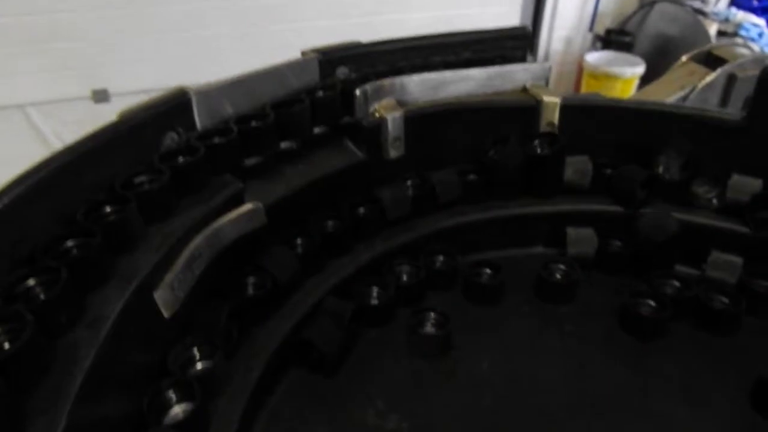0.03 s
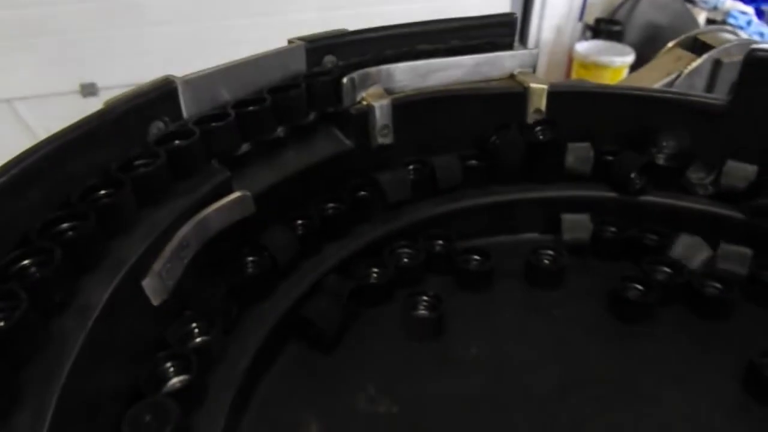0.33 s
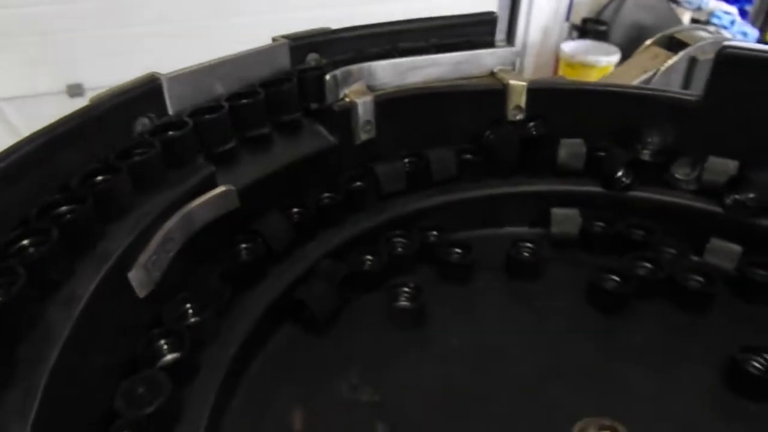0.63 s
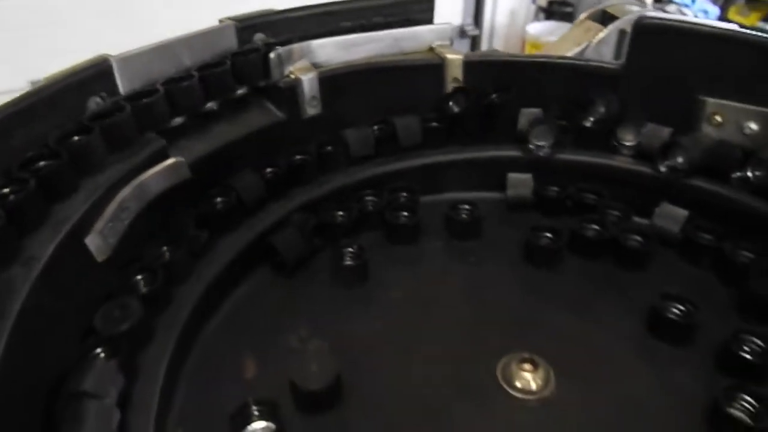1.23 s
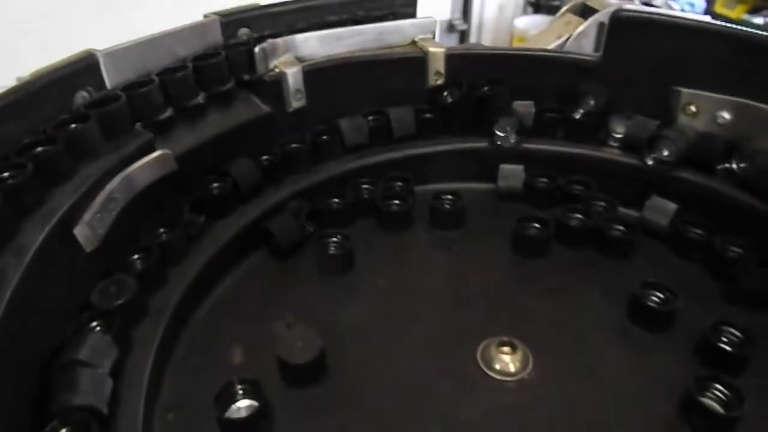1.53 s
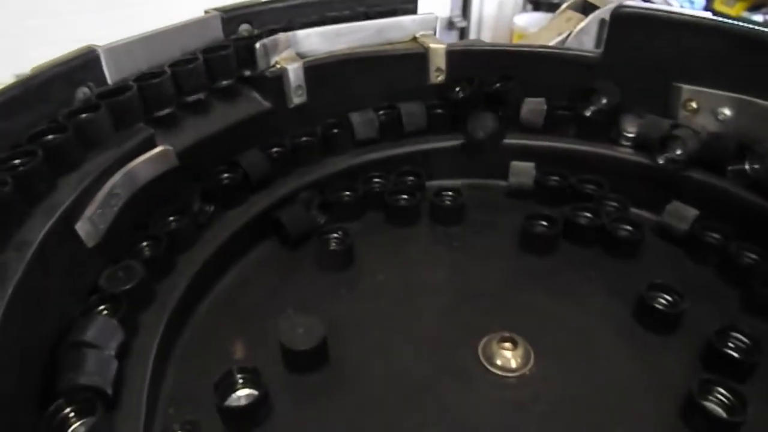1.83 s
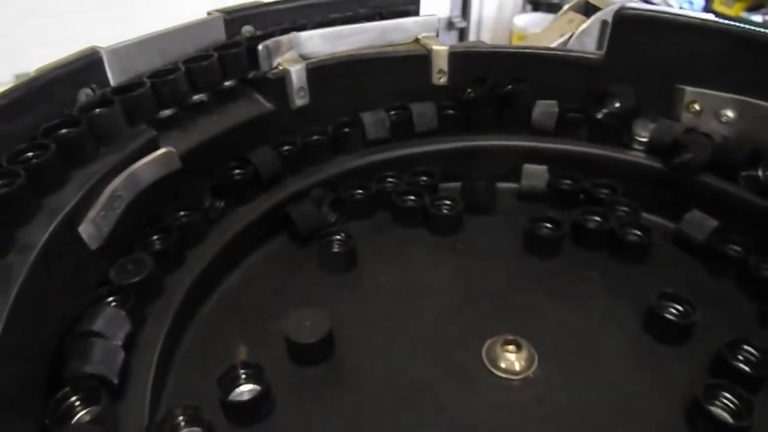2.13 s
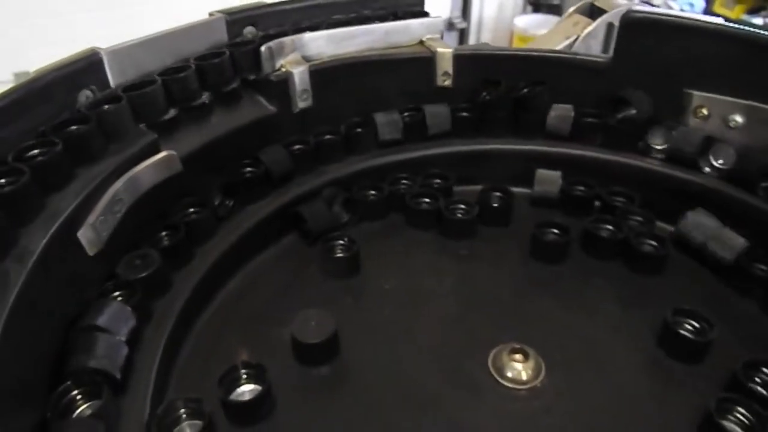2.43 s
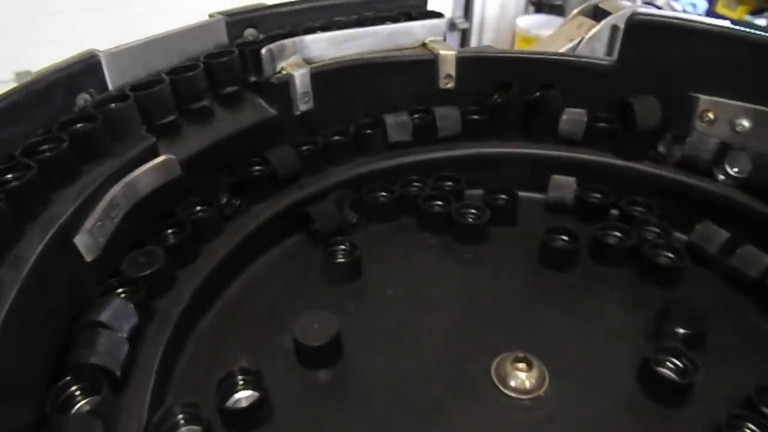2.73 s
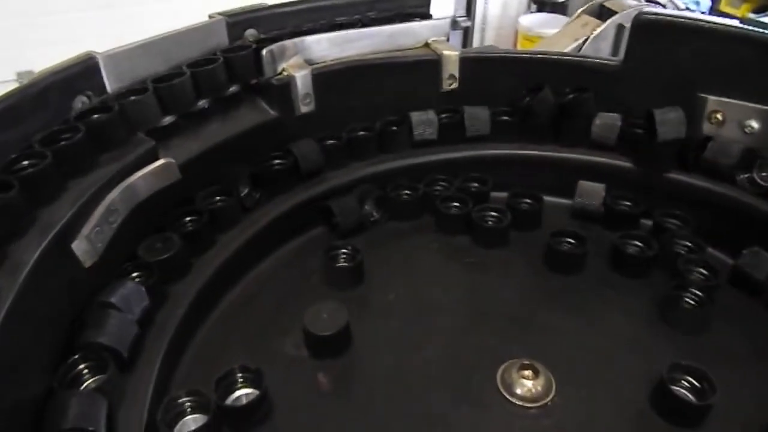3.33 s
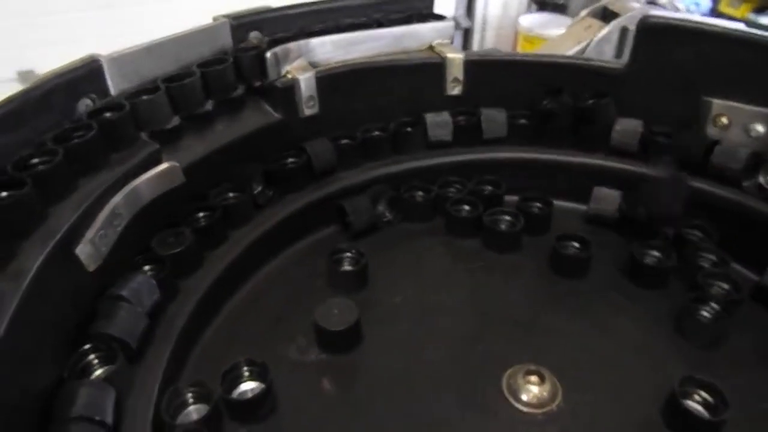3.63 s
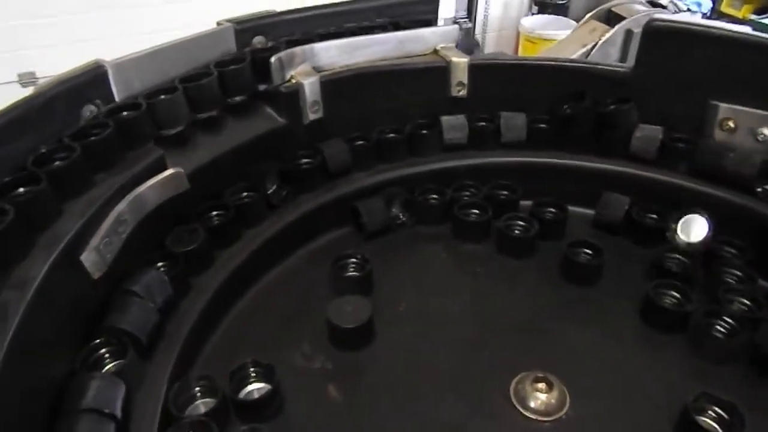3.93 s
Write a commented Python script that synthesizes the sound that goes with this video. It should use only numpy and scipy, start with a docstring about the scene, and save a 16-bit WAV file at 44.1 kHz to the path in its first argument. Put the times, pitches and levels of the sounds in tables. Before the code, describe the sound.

A parts sorter bowl hums and whirs steadily with a thin hiss, heard from just above. Small plastic caps patter and click sharply from the start, with short rattles from hard landings after 1.2 seconds. The patter dips near 2 seconds, then returns louder as caps rub a steel guide with a thin, fluttering ring. The guide clinks at 2.9 and 3.9 seconds, with clustered clicks around 3.6.

```python
"""A sorter bowl is running in a workshop: mains hum, motor tones and a thin hiss over a steady whir.
From the start, small plastic caps patter on its turning disc and click against each other;
a limiter briefly turns everything down after the sharpest clicks. From 1.2 s some caps land hard
and shake the bowl. The patter fades near 2 s, then comes back louder as caps rub a steel guide.
At 2.9 s and again just before the end, a blow sets the guide ringing."""
import sys
import numpy as np
from scipy import signal
from scipy.fft import rfft, irfft, next_fast_len
from scipy.io import wavfile
from scipy.ndimage import uniform_filter1d, minimum_filter1d, map_coordinates

SR = 44100
rng = np.random.default_rng(int(sys.argv[2]) if len(sys.argv) > 2 else 0)


def output_pcm(signal):
    """Save a mono or channel-first signal as 16-bit PCM at the path in sys.argv[1].

    Samples are clipped to [-1, 1] before scaling.
    """
    pcm = np.clip(np.atleast_2d(signal).T, -1, 1) * 32767
    wavfile.write(sys.argv[1], SR, np.round(pcm).astype(np.int16))


N = 176400  # 4 seconds


# Caps clicking: start_s, level_db, pitch_hz, fade_s, relative_crack_db
# (a fade is the time a sound takes to drop by 60 dB)
CAP_CLICKS = [(.0078, -9, 4570, 0.021, -17), (.0964, -6, 4600, 0.0078, -26),
              (.4524, 5.5, 5950, 0.0019, -40), (.5618, -8.5, 5000, 0.0078, -35),
              (.9848, 8.5, 4740, 0.0041, -13), (.993, 4, 3950, 0.0054, -34),
              (1.0808, -11, 4060, 0.022, -28), (1.1105, -8.5, 3820, .01, -26),
              (1.1372, -10, 4170, .012, -28), (1.1619, -8.5, 4070, 0.007, -22),
              (1.1965, -11.5, 3770, .012, -22), (1.5674, -7, 4800, 0.012, -25),
              (1.697, -11.5, 3890, 0.013, -38), (1.7787, -7, 4940, 0.021, -24),
              (1.8138, -12, 4670, 0.012, -30), (1.8466, -13, 4638, .008, -26),
              (1.8771, -12, 4532, 0.0085, -14), (1.8912, -5.5, 4660, .01, -27),
              (1.948, -6.5, 5240, 0.011, -3.5), (2.2647, -6.5, 4900, 0.0044, -30),
              (2.3636, -14, 4500, 0.02, -30), (2.4657, -4, 5650, 0.0042, -24),
              (2.4672, 3.5, 6280, 0.0014, -10.5), (2.5498, -6, 4930, 0.0074, -32),
              (2.9114, -6, 3510, 0.011, -13), (2.914, -6, 3400, 0.0093, -22),
              (3.4922, -8.5, 5300, 0.011, -26), (3.566, -2, 4630, 0.0087, -21),
              (3.5841, -7.5, 4497, 0.015, -14), (3.6303, -9, 3765, 0.036, -11),
              (3.6648, -8, 5250, 0.0069, -19), (3.667, -7, 5000, 0.0062, -25),
              (3.675, 7.5, 5820, 0.0021, -21), (3.6945, -6, 4804, 0.0046, -13),
              (3.7205, -8.5, 3770, 0.016, -40), (3.7245, -8, 5240, .015, -27),
              (3.7925, -11, 5640, .005, -30), (3.922, -4.5, 3200, 0.0053, -1)]
# The tones of one cap: pitch_ratio, relative_db
CAP_TONES = [(.7, -12), (.85, -6), (1, 0), (1.17, -6), (1.4, -12)]
# Caps that strike on their rim and ring high: start_s, level_db
RIM_STRIKES = [(.078, -32), (.9855, -32), (1.081, -37), (1.1105, -30), (1.137, -34), (1.877, -34),
               (1.891, -37), (3.185, -39), (3.492, -30)]

def cap_clicks():
    """A struck cap cracks and rings for a moment; the bowl and the room echo it."""
    out, t = np.zeros(N), np.arange(SR // 25) / SR
    contact_s, crack_fade_s, rim_hz, rim_fade_s = 0.00017, 0.0016, 8520, 0.03
    crack_band = signal.butter(2, [3060, 10170], "band", fs=SR, output="sos")
    rise = 1 - np.exp(-(t / contact_s) ** 2)
    for start_s, db, hz, fade_s, crack_db in CAP_CLICKS:
        ring = np.zeros(len(t))
        for ratio, tone_db in CAP_TONES:
            tone_fade_s = fade_s if ratio == 1 else 0.88 * fade_s
            level = rise * amp(tone_db + rng.normal(0, 1.4) - 60 * t / tone_fade_s)
            tone_hz = hz * ratio * rng.normal(1, 0.019)
            ring += level * np.sin(2 * np.pi * (tone_hz * t + rng.random()))
        burst = 2 * rng.standard_normal(len(t)) * amp(crack_db - 60 * t / crack_fade_s)
        click = amp(db) * (ring / np.abs(ring).max() + signal.sosfilt(crack_band, burst))
        add(out, start_s, click)
        add(out, start_s, amp(-11.5) * echo(click, fade_s=0.031))  # bowl
        add(out, start_s, amp(-19) * echo(click, fade_s=0.35))  # room
    for start_s, db in RIM_STRIKES:
        add(out, start_s, rise * amp(db - 60 * t / rim_fade_s) * np.sin(2 * np.pi * rim_hz * t))
    # Small caps give off no bass.
    return signal.sosfilt(signal.butter(2, 1080, "high", fs=SR, output="sos"), out)


# Caps landing hard: start_s, level_db, fade_s
HARD_LANDINGS = [(1.245, -27.5, 0.19), (1.937, -23.5, 0.16), (2.497, -28.5, .25), (2.91, -21, 0.19),
                 (2.955, -22.5, .15), (3.695, -19.5, 0.47), (3.921, -24, 0.66)]
# Tone colour of the shaken bowl: pitch_hz, relative_db
RATTLE_COLOUR = [(200, -50), (1200, -14), (2200, -4), (3600, -4), (5600, 11.5), (6700, 4.5), (7300, -2),
                 (10000, -10), (13000, -24), (16000, -29)]

def bowl_rattles():
    """A hard landing shakes the bowl into a dense rattle that dies away."""
    out, t = np.zeros(N), np.arange(SR // 2) / SR
    for start_s, db, fade_s in HARD_LANDINGS:
        noise = coloured(rng.standard_normal(N), RATTLE_COLOUR)
        rattle = unit(noise * amp(2.2 * wobble(per_s=300)))
        add(out, start_s, rattle[:len(t)] * strike(t, db, fade_s))
    return out


# Blows on the steel guide: start_s, level_db
GUIDE_BLOWS = [(2.911, -31), (3.921, -25)]
# The tones of the struck guide: pitch_hz, relative_db, fade_s
STEEL_TONES = [(2247, -9, .4), (2815, -5, .4), (3694, -3, .35), (4507, -8, .35), (5025, 0, .45),
               (5790, -6, .3), (7980, -14, .22), (8430, -16, .22), (9380, -13, .25), (10150, -17, .2),
               (10520, -17, .2), (12820, -23, .25)]

def guide_rings():
    """Struck steel rings with many slightly rough tones at once."""
    out, t = np.zeros(N), np.arange(SR // 2) / SR
    for start_s, db in GUIDE_BLOWS:
        for hz, tone_db, fade_s in STEEL_TONES:
            level = strike(t, db + tone_db + rng.normal(0, 2.4), fade_s)
            roughness = 0.9 * wobble(per_s=217)[:len(t)]
            add(out, start_s, level * np.sin(2 * np.pi * hz * t + roughness))
    return out


# Knocks on the bowl: start_s, level_db
WALL_KNOCKS = [(1.569, -43), (3.64, -32)]

def wall_knocks(pitch_hz=340):
    """A cap knocks the bowl's wall, which gives one short, dull tone."""
    out, t = np.zeros(N), np.arange(SR // 2) / SR
    for start_s, db in WALL_KNOCKS:
        tone = np.sin(2 * np.pi * pitch_hz * t + wobble(per_s=120)[:len(t)])
        add(out, start_s, tone * strike(t, db, fade_s=0.075))
    return out


# How hard the caps slide along the wall: time_s, effort_db
SLIDE_EFFORT = [(0.0, -36), (0.14, -32), (1.54, -32), (1.8, -31), (2.03, -43.5), (2.28, -32), (2.85, -25),
                (3.3, -30), (3.54, -25.5), (3.81, -23.5), (4.0, -29.5)]
# Tone colour of the patter: pitch_hz, relative_db
PATTER_COLOUR = [(1500, -22), (2800, 6), (3400, -3), (4200, 6.5), (5300, 5.5), (6500, 1), (7300, -9),
                 (9000, -22.5), (12000, -57), (16000, -38)]

def cap_patter(taps_per_s=500):
    """Sliding caps make many tiny taps that echo in the bowl."""
    taps = (rng.random(N) < taps_per_s / SR) * rng.choice([-1, 1], N)
    taps = taps * amp(4.5 * np.minimum(rng.exponential(size=N), 4))  # a few stand out
    patter = coloured(taps + echo(taps, fade_s=0.031)[:N], PATTER_COLOUR)
    effort_db = curve(SLIDE_EFFORT)
    return amp(-36 + 1.21 * (effort_db - effort_db.mean())) * patter


# Loudness of the rubbing: time_s, level_db
RUB_LEVELS = [(0, -56), (.45, -54), (.56, -40), (.7, -54), (1.5, -47), (2.1, -52), (2.64, -48), (2.76, -32),
              (2.87, -33), (2.92, -41), (3.04, -36), (3.14, -44), (3.23, -37), (3.29, -43), (3.36, -33),
              (3.45, -46), (4, -42)]
# The tones of the rubbed guide: pitch_hz, relative_db
RUB_TONES = [(4500, -22), (5006, -4), (5039, -1), (7320, -19)]

def guide_rub():
    """Caps rub the steel guide and draw a thin, fluttering ring from it."""
    ring, t = np.zeros(N), np.arange(N) / SR
    for hz, db in RUB_TONES:
        level = amp(db + 2.5 * wobble(per_s=35.23))
        ring += level * np.sin(2 * np.pi * hz * t + 0.45 * wobble(per_s=40))
    return amp(curve(RUB_LEVELS)) * unit(ring)


# Magnetic hum: multiple_of_mains, level_db
HUM_TONES = [(2, -48), (4, -65.5), (8, -53), (10, -36.4), (12, -56), (14, -54.5), (18, -45), (22, -52),
             (26, -54.5), (30, -51.5), (32, -58)]
# The turning motor: multiple_of_shaft_rate, level_db
MOTOR_TONES = [(4, -52), (8, -46), (12, -39), (15, -43), (16, -37), (18, -60), (20, -48.5), (24, -48),
               (26, -63), (32, -49.5), (40, -66), (46, -53), (59, -50), (60, -50), (66, -56), (68, -39),
               (69, -47), (70, -48.5), (71, -44), (72, -48), (73, -44.5)]

def motor(mains_hz=49.98, shaft_hz=47.853):
    """Mains power hums at a fixed pitch; the motor's tones follow its slightly drifting speed."""
    hum = tones(mains_hz, np.ones(N), HUM_TONES)
    speed = 1 + 0.0003 * wobble(per_s=1.95)
    return hum + tones(shaft_hz, speed, MOTOR_TONES)


# Tone colour of the whir: pitch_hz, relative_db
WHIR_COLOUR = [(25, -40), (55, -48), (85, -37), (140, -15), (280, -13), (350, -5.5), (430, -7), (510, 3),
               (650, -2.5), (740, -2), (800, 4.5), (910, 3.5), (1020, -1), (1350, -1), (1600, 0.5),
               (2200, 1), (2600, -1), (3100, -0.5), (3350, 8), (3800, 7), (4250, 0), (5000, 0),
               (6000, -1.5), (6800, -10), (7150, -17.5), (9300, -18), (10300, -24), (11800, -26.5),
               (14000, -27.5), (16000, -34)]

def whir():
    """The fan and the turning disc make a slightly patchy rush."""
    spectrum = signal.stft(rng.standard_normal(N), nperseg=512)[2]
    patches = uniform_filter1d(rng.standard_normal(spectrum.shape), size=5, axis=0)  # blur in pitch
    patches = unit(uniform_filter1d(patches, size=10, axis=1))  # blur in time
    noise = signal.istft(spectrum * amp(0.5 * patches), nperseg=512)[1][:N]
    return amp(-28.5 + 1.07 * wobble(per_s=60)) * coloured(noise, WHIR_COLOUR)


# Narrow bands of hiss: pitch_hz, half_width_hz, level_db
HISS_BANDS = [(8670, 160, -61), (10820, 160, -62.5), (11060, 150, -61), (13050, 150, -71),
              (13420, 180, -69), (14080, 200, -68)]

def hiss():
    """Friction makes the drive hiss at a few high pitches."""
    out = np.zeros(N)
    for hz, half_width_hz, db in HISS_BANDS:
        level = amp(db + wobble(per_s=13))
        band = filtered(rng.standard_normal(N), lambda f: 1 / (1 + 1j * (f - hz) / half_width_hz) ** 2)
        out += level * unit(band)
    return out


def tones(base_hz, speed, rows):
    """Multiples of one pitch; the higher ones waver more, up to a limit."""
    angle, out = 2 * np.pi * base_hz * np.cumsum(speed) / SR, np.zeros(N)
    for multiple, db in rows:
        waver_db = min(1.1 * multiple * base_hz / 1000, 1.8)
        phase = multiple * angle + 2 * np.pi * rng.random() + 0.13 * waver_db * wobble(per_s=21.98)
        out += np.sqrt(2) * amp(db + waver_db * wobble(per_s=12)) * np.sin(phase)
    return out


def strike(t, db, fade_s, rise_s=0.00069):
    """The loudness of a blow: a fast rise, then a fade."""
    return (1 - np.exp(-t / rise_s)) * amp(db - 60 * t / fade_s)


def amp(db):
    """Decibels to gain."""
    return 10 ** (np.asarray(db) / 20)


def unit(x):
    """x scaled to an average (rms) level of 1."""
    return x / np.sqrt(np.mean(x ** 2) + 1e-20)


def curve(rows):
    """Join (time_s, value) points with straight lines."""
    return np.interp(np.arange(N) / SR, *np.transpose(rows))


def wobble(per_s):
    """A smooth curve through per_s random points a second."""
    points = rng.standard_normal(int(N * per_s / SR) + 4)
    return map_coordinates(points, [np.arange(N) * per_s / SR], mode="nearest")


def filtered(x, gain_at):
    """Scale each frequency in x by gain_at(hz)."""
    size = next_fast_len(N + SR // 2)
    return irfft(rfft(x, size) * gain_at(np.fft.rfftfreq(size, 1 / SR)), size)[:N]


def coloured(x, colour):
    """Give x a tone colour, at an average level of 1."""
    pitch_hz, db = np.transpose(colour)
    return unit(filtered(x, lambda hz: amp(np.interp(np.log(hz + 1), np.log(pitch_hz), db))))


def add(out, start_s, sound):
    """Mix a sound into out at start_s."""
    part = out[round(start_s * SR):][:len(sound)]
    part += sound[:len(part)]


def echo(x, fade_s):
    """A fading blur of reflections of x."""
    t = np.arange(SR // 4) / SR
    tail = rng.standard_normal(len(t)) * amp(-60 * t / fade_s) * (t > .001)
    return signal.fftconvolve(x, tail / np.linalg.norm(tail))


def scene():
    """Machine and caps, heard from just above the bowl."""
    machine = motor() + whir() + hiss()
    caps = cap_patter() + guide_rub() + cap_clicks() + bowl_rattles() + guide_rings() + wall_knocks()
    return (machine + caps)[None]


def record(dry):
    """Cut one narrow pitch band, turn down briefly at loud peaks, clip, and drop the highest treble."""
    notch_hz, top_hz, ceiling, hold_s, release_s = 7000, 15900, 1.2, 0.019, 0.012
    x = filtered(dry[0], lambda hz: (hz - notch_hz) / (hz - notch_hz - 35j))
    excess_db = 20 * np.log10(np.maximum(np.abs(x) / ceiling, 1))
    needed_db = minimum_filter1d(-excess_db, size=31)
    hold = 2 * int(hold_s * SR / 2) + 1
    held_db = minimum_filter1d(needed_db, size=hold, origin=hold // 2)
    release = np.arange(N) / SR / release_s  # each cut eases off after its hold
    cut_db = np.exp(np.maximum.accumulate(np.log(1e-9 - held_db) + release) - release)
    limited = np.clip(x * amp(-uniform_filter1d(cut_db, size=15)), -1, 1)
    return filtered(limited, lambda hz: hz < top_hz)[None]


dry = scene()
out = record(dry)
output_pcm(out)
```